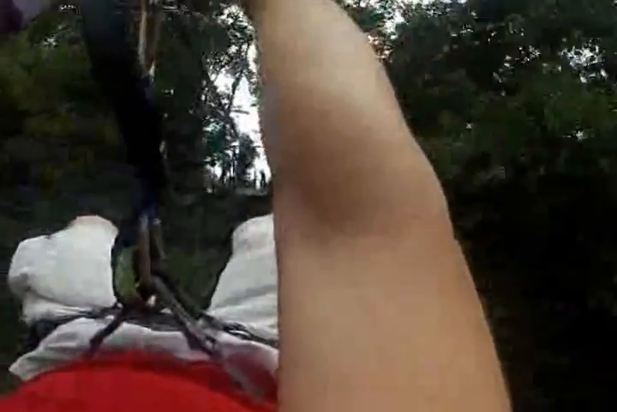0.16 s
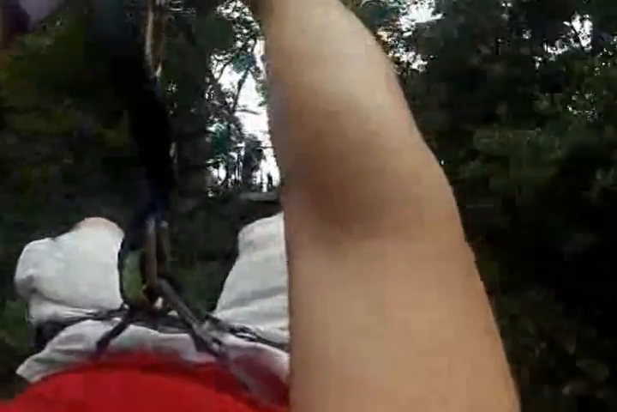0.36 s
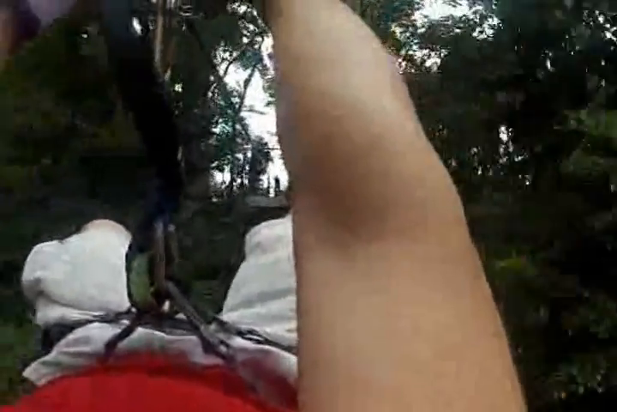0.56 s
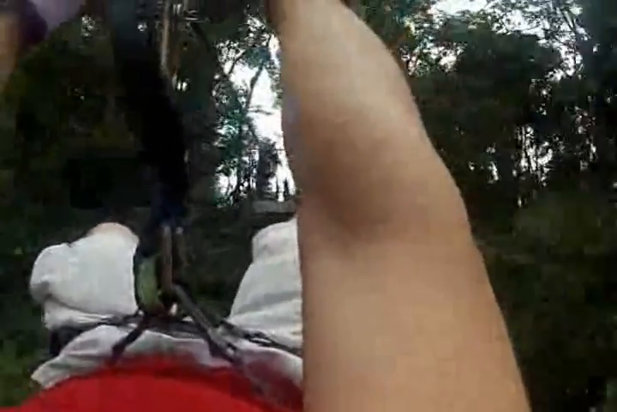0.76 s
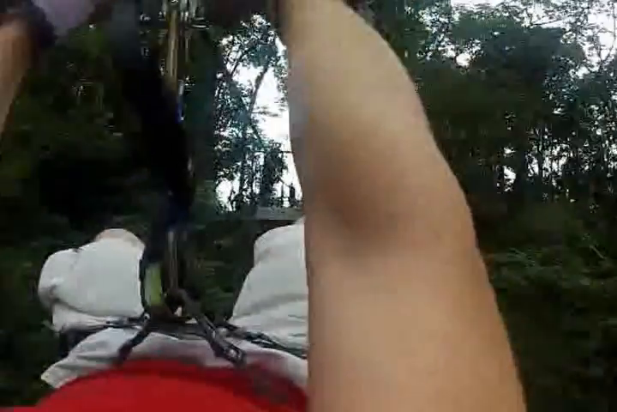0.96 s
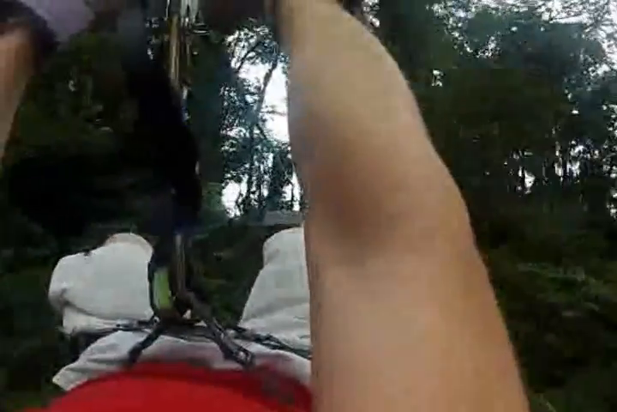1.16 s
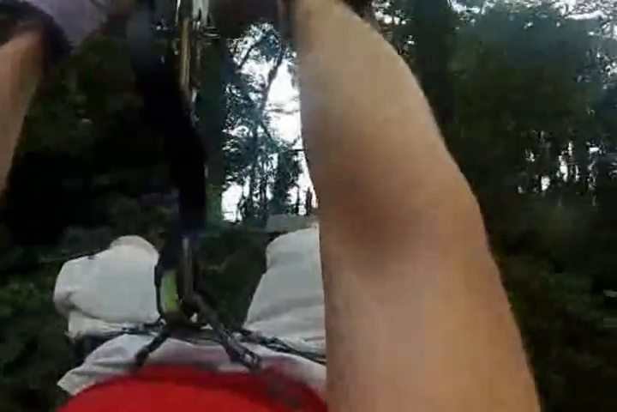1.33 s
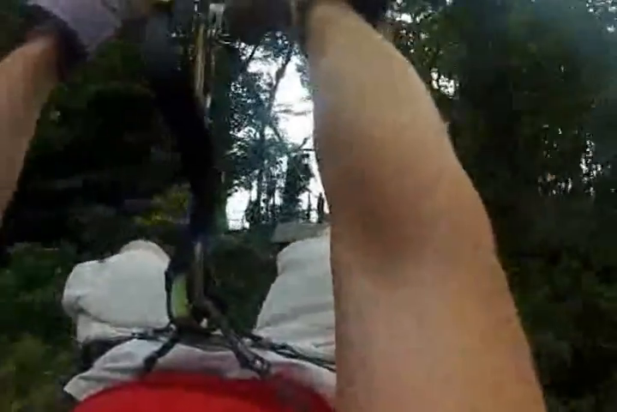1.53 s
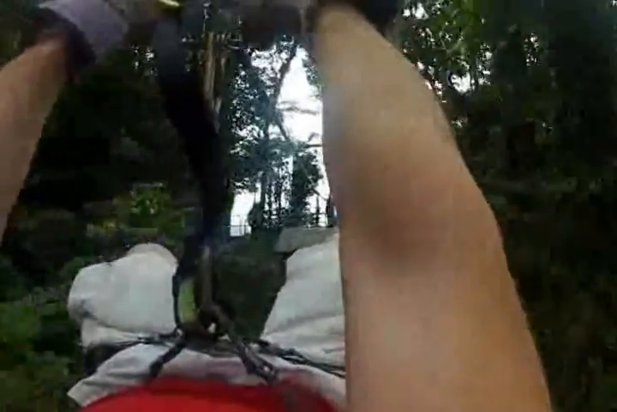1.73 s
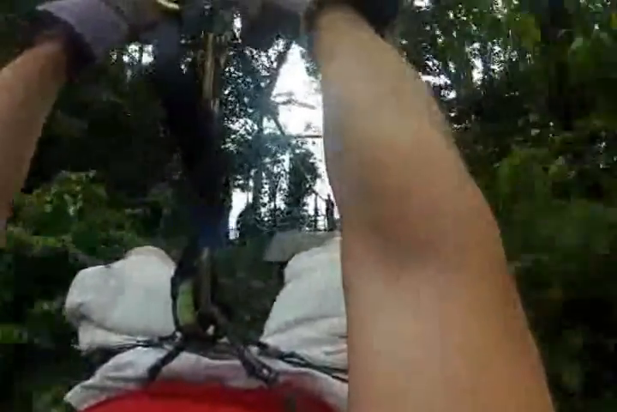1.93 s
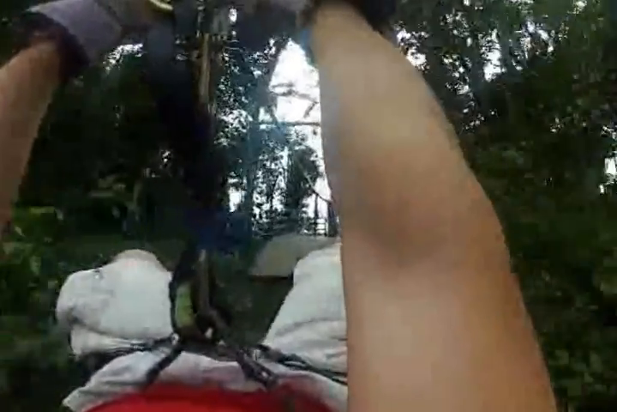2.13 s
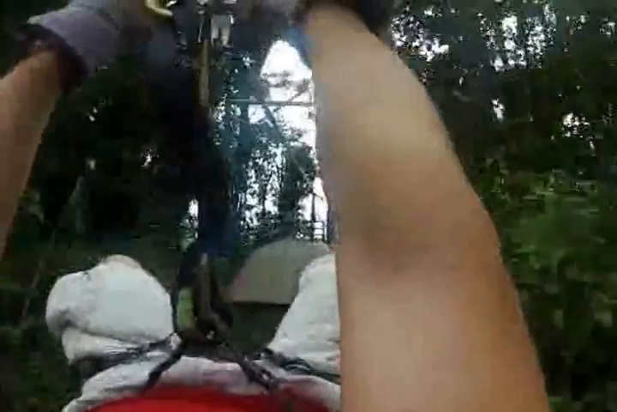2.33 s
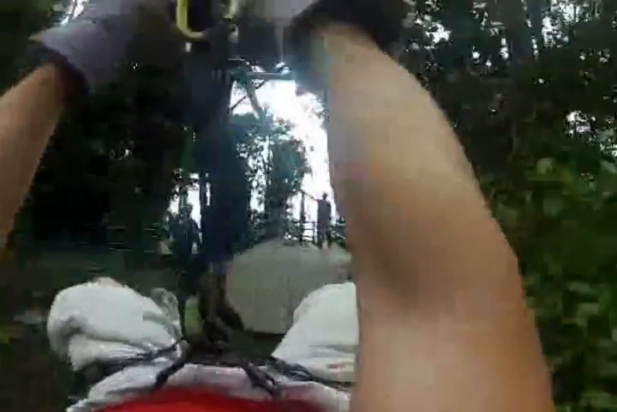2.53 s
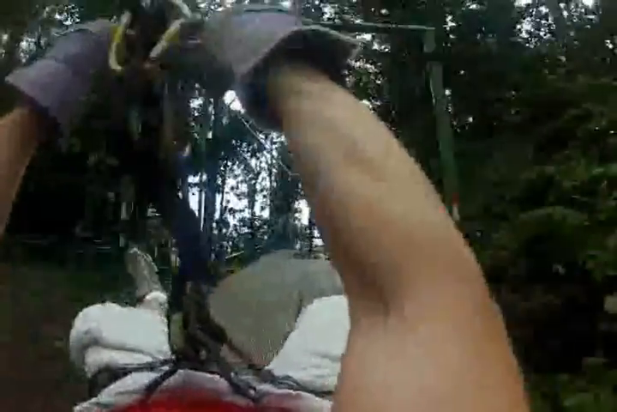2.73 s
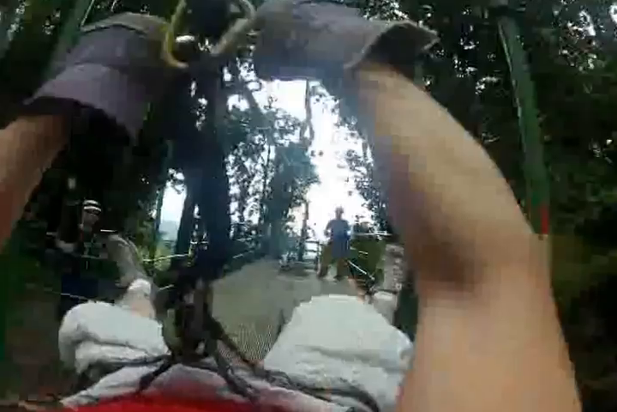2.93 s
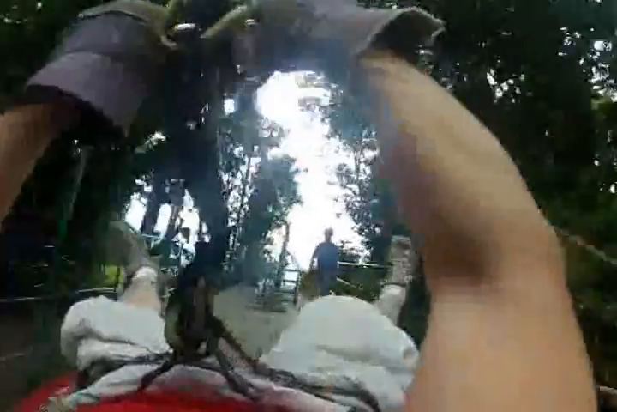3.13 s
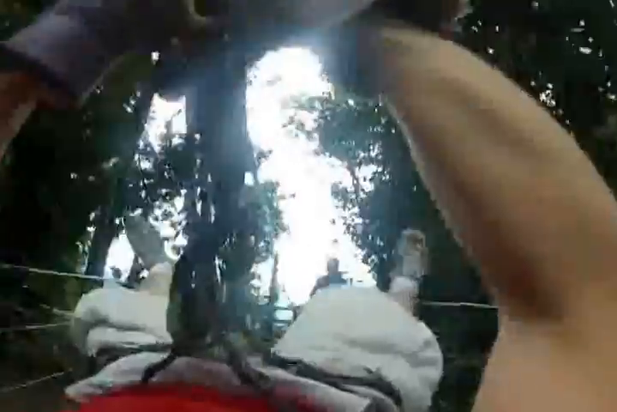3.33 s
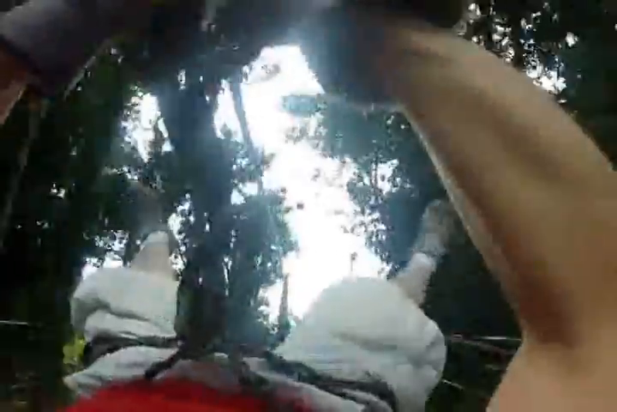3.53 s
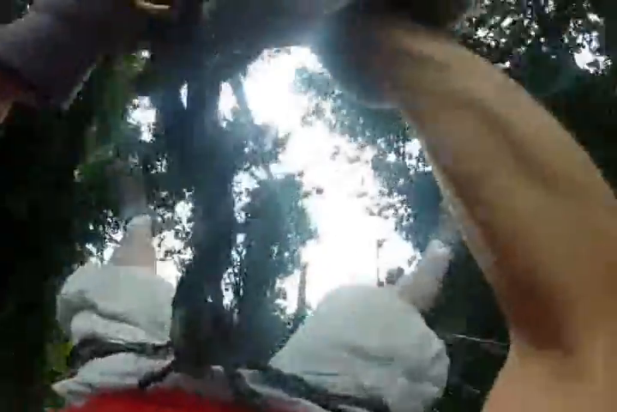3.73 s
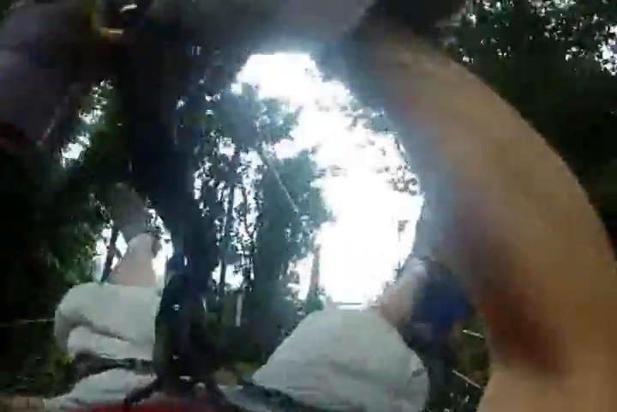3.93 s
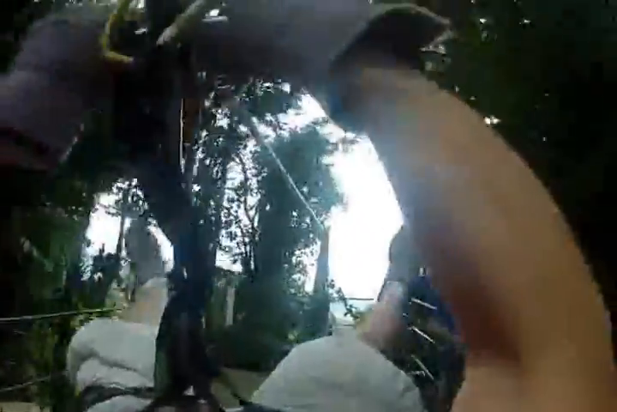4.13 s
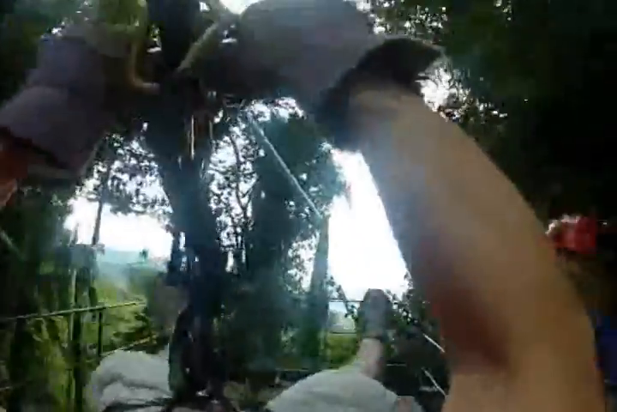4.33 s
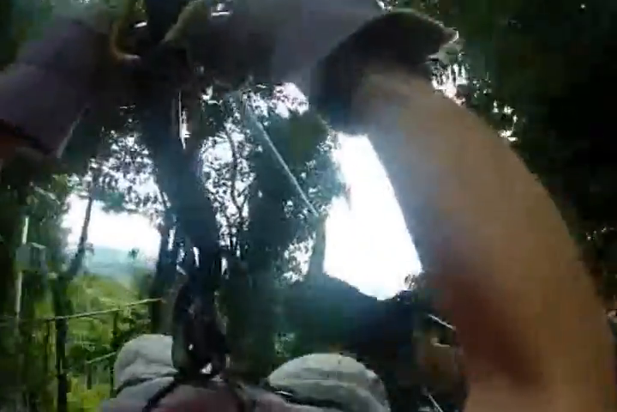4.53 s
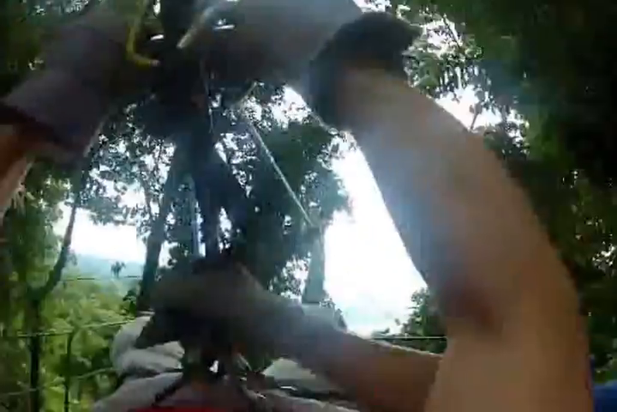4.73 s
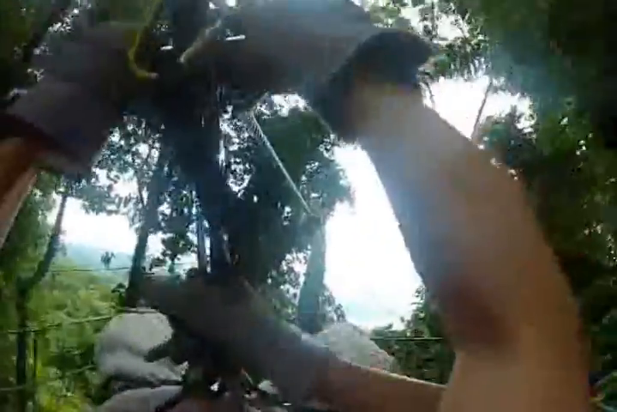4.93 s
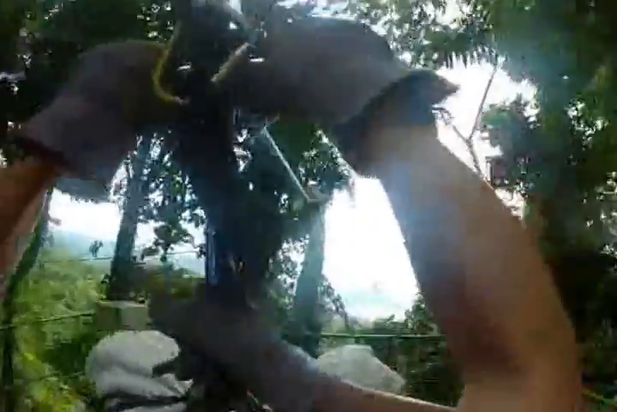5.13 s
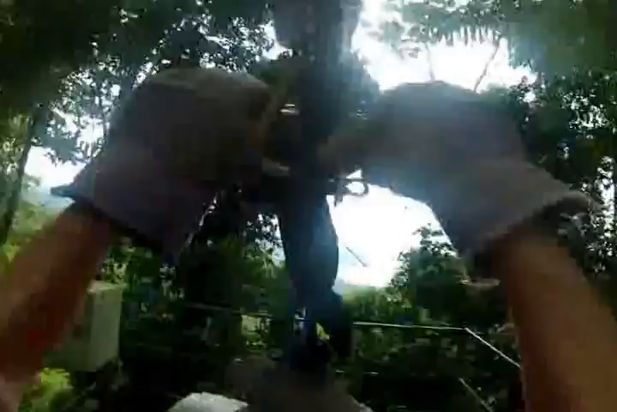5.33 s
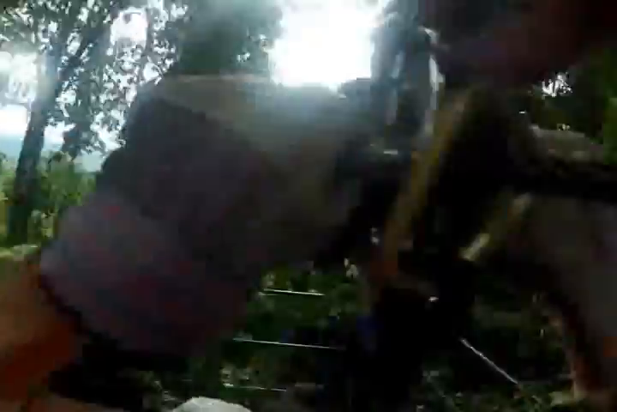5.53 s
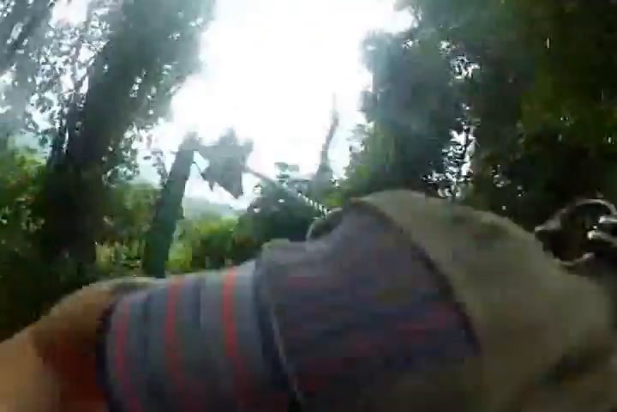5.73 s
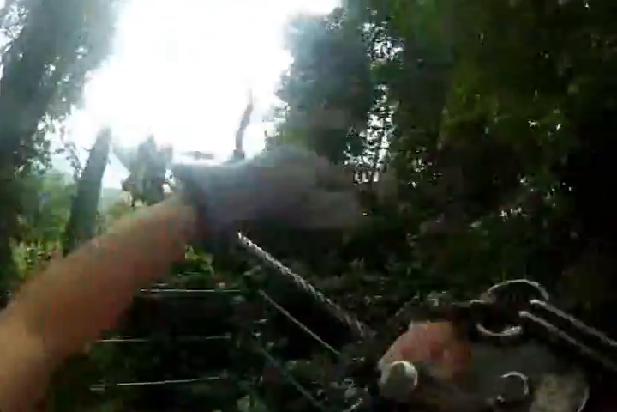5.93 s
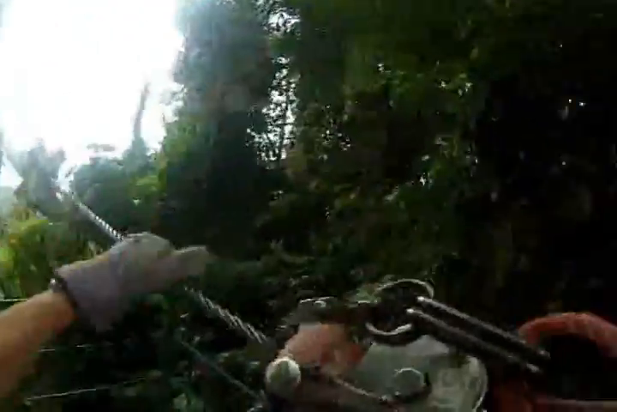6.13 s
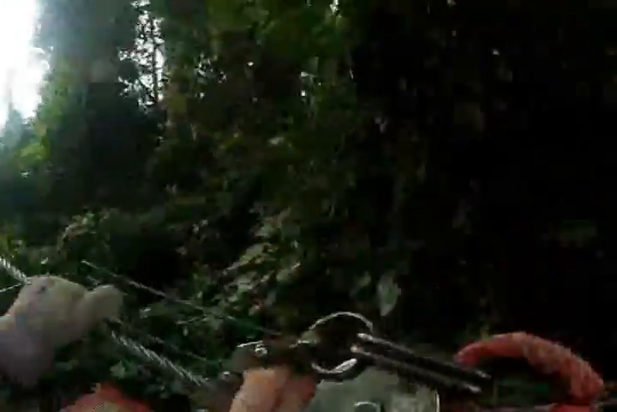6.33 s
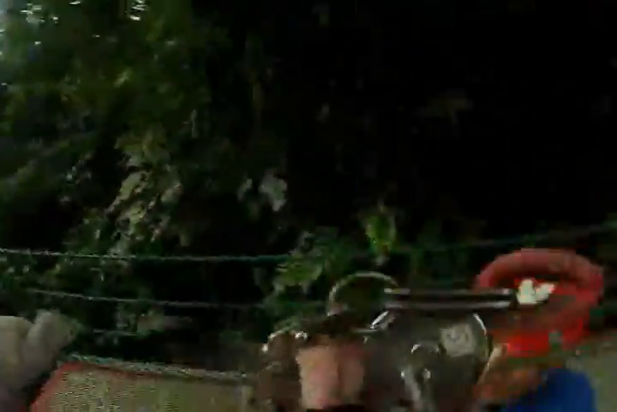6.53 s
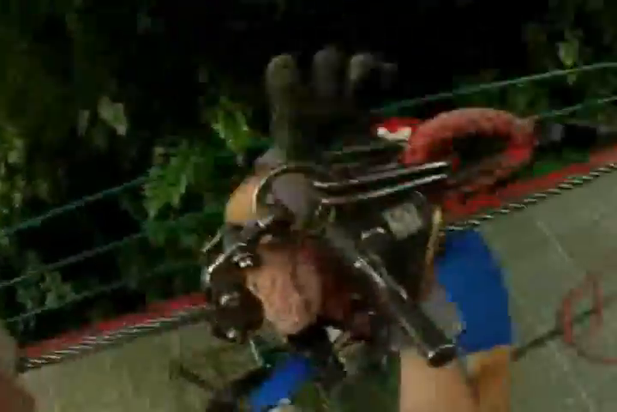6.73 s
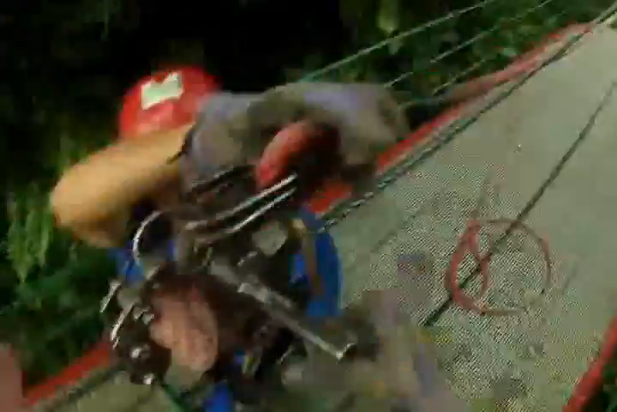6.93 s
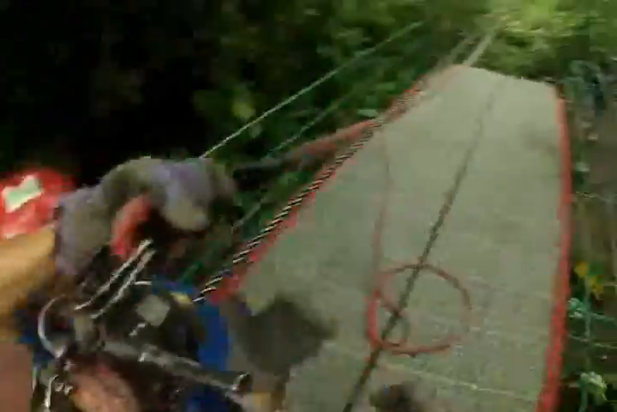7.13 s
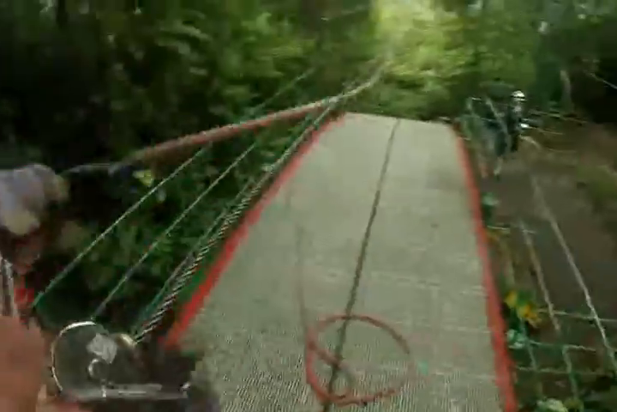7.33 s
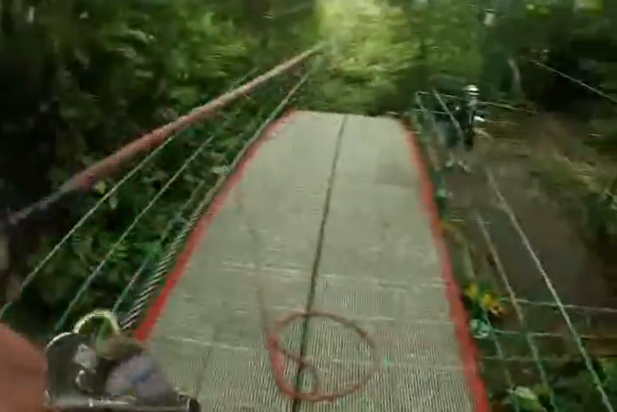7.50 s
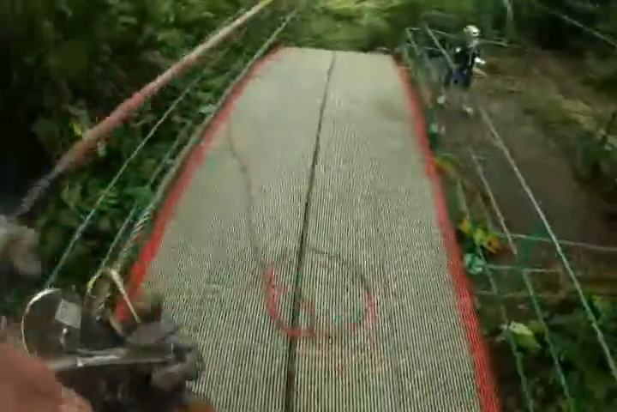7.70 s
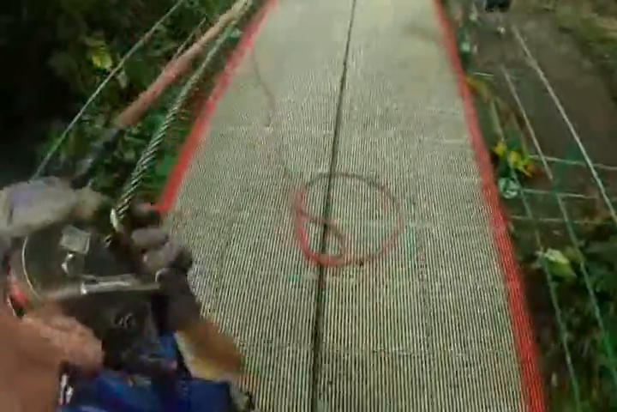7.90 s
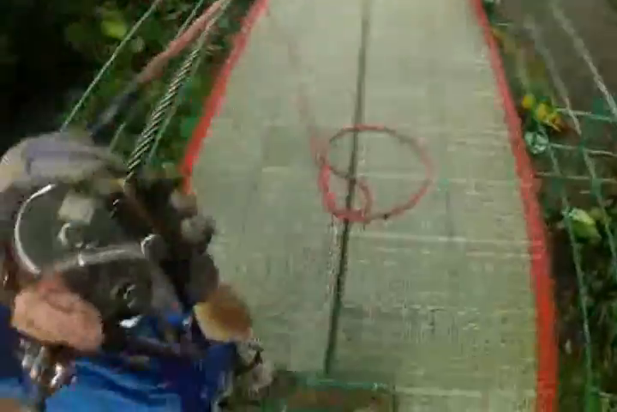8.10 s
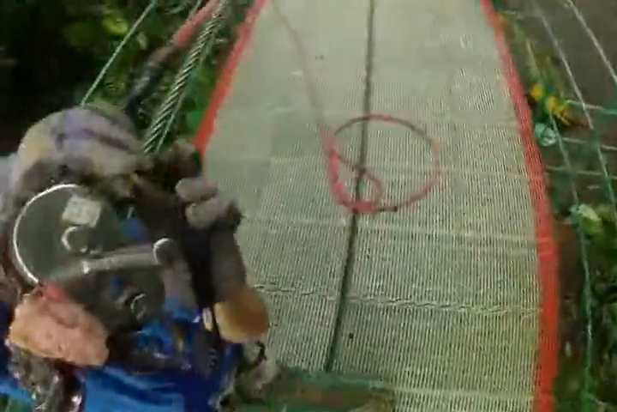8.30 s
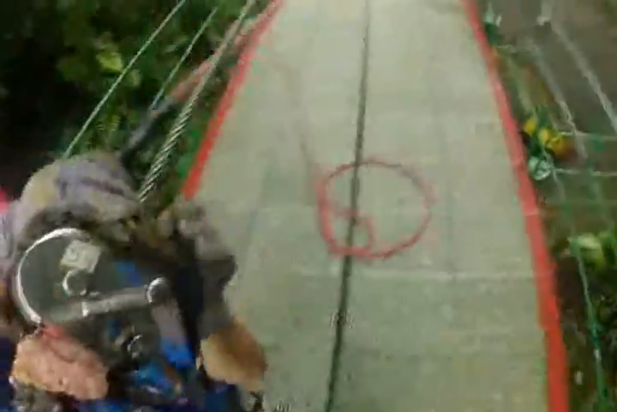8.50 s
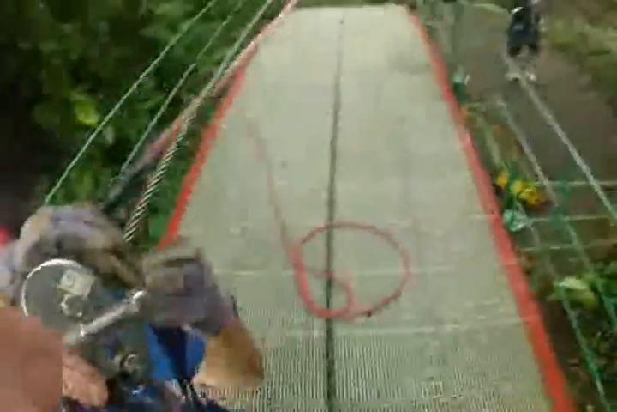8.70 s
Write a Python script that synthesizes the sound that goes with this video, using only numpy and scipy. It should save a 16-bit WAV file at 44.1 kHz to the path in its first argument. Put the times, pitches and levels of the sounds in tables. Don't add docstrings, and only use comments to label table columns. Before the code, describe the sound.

A pulley trolley is already rolling on a steel cable, a loud, gritty metallic rush over low, boxy wind rumble. From about 0.3 s a wavering strand whine slides downward as the ride slows, breaking up and softening toward 2.5 s, then rising slightly. At 3 s the trolley bites the brake: a hard rap, loud scraping, clip clinks, and the heaviest cluster of bangs and booming thuds around 3.5 s. From 3.7 s it drags on with a fading scrape, a clink at 4.1 and a brief sagging squeal near 4.4. Small stuttering jerks at 5.2-5.5 end the motion. Clips clink sharply near 5.9, and a strap creaks upward around 6.15. Until about 9 s, sparse webbing rubs, light taps and dull case bumps sit over faint hiss and distant leaves. The close, sealed-camera sound is narrow, boomy and coarse, with false metallic treble.

```python
import sys
import numpy as np
from scipy import signal
from scipy.fft import rfft, irfft
from scipy.io import wavfile
from scipy.ndimage import uniform_filter1d

SR = 44100
rng = np.random.default_rng(int(sys.argv[2]) if len(sys.argv) > 2 else 0)


def volts(x):
    e = np.asarray(x, float) / 20
    return 10 ** e


def persist_wave(psi):
    counts = np.round(np.clip(psi, -1, 1) * 32767).astype(np.int16)
    wavfile.write(sys.argv[1], SR, np.atleast_2d(counts).T)


N = 390723


def level(x, db=0):
    return x * volts(db) / np.sqrt(np.mean(x ** 2))


def add(out, s, sound):
    i = int(s * SR)
    out[i:i + len(sound)] += sound[:len(out) - i]


def play(table):
    s, *columns = np.transpose(table)
    t = np.arange(N) / SR
    inside = uniform_filter1d(1. * ((t >= s[0]) & (t <= s[-1])), size=600)
    return [inside] + [np.interp(t, s, c) for c in columns]


def walk(rate, size=N):
    k = int(SR / rate)
    held = np.repeat(rng.standard_normal(size // k + 1), k)
    return 1.222 * uniform_filter1d(uniform_filter1d(held, k), k)[:size]


def band(x, hz, width_hz):
    return signal.lfilter(*signal.iirpeak(hz, hz / max(width_hz, 5), fs=SR), x)


def rings(strength, modes, patchy_db=0):
    total = 0
    for hz, width, db in modes:
        noise = strength * rng.standard_normal(len(strength))
        ring = band(band(noise, hz, 1.05 * width), hz, 4.0 * width)
        swell_db = patchy_db * min(120 / width, 1) * walk(25, size=len(strength))
        total = total + volts(db + swell_db) * ring
    return level(total)


def grit(scatter_db, flicker_db, rate, size):
    slip_samples = 24
    slip = np.minimum(rng.exponential(size=size // slip_samples + 1), 3.5)
    slips = np.repeat(volts(scatter_db * slip), slip_samples)[:size]
    return slips * volts(flicker_db * walk(rate, size=size))


def friction(force, modes, balance, scatter_db, flicker_db, rate):
    out = np.zeros(N)
    span = force[0] > 1e-6
    inside, db = force[0][span], force[1][span]
    low_db = balance[0] + balance[1] * (db + 46)
    high_db = balance[2] + balance[3] * (db + 42.5)
    drive = grit(scatter_db, flicker_db, rate, size=len(db))
    middle = rings(drive, [m for m in modes if 1450 <= m[0] < 2600], patchy_db=2.5)
    low = rings(drive, [m for m in modes if m[0] < 1450], patchy_db=4.5)
    high = rings(drive, [m for m in modes if m[0] >= 2600], patchy_db=2.7)
    out[span] = inside * volts(db) * (middle + volts(low_db) * low + volts(high_db) * high)
    return out


# t/s, friction level/dB
ROLLING_FORCE = [(0.0, -36), (.3, -41), (.4, -37.5), (1.36, -40), (1.46, -45), (2.42, -49), (2.5, -44.5),
                 (2.95, -46), (3.04, -39)]
# f/Hz, width/Hz, level/dB
TROLLEY_MODES = [(1067, 530, 17), (1190, 600, -22), (1800, 226, 1), (2129, 53, 9), (2380, 570, 3.5),
                 (2945, 64, 4.5), (3260, 920, -7.5), (3470, 850, -7.5)]
# low ring level/dB, slope/(dB per dB), high ring level/dB, slope/(dB per dB)
TROLLEY_TILT = (-3, -.5, -2.5, -0.15)


def rolling():
    return friction(play(ROLLING_FORCE), TROLLEY_MODES, TROLLEY_TILT, 2.43, 0.38, 39.1)


# multiple of the strand rate, level/dB
WHINE_PARTIALS = [(3, -2), (4, 4), (5, 1.5)]


def whine(table):
    inside, hz, db = play(table)
    overtone_db = -11 + 0.2789 * (np.clip(hz, 535, 595) - 550)
    phase = 2 * np.pi * np.cumsum(hz * (1 + 0.01195 * walk(140))) / SR
    overtones = sum(volts(d + 3.15 * walk(120)) * np.sin(k * phase) for k, d in WHINE_PARTIALS)
    stutter_db = np.maximum(.075 * (570 - hz), 1) * walk(22.04)
    leading = volts(3.8 * walk(90) + stutter_db) * np.sin(2 * phase)
    return inside * volts(db + 6.5) * (leading + volts(overtone_db) * overtones)


# t/s, strand rate f/Hz, level/dB
STRAND_WHINE = [(.25, 617, -60.5), (.5, 605.4, -50.5), (1.4, 554.3, -49), (1.5, 549, -60),
                (1.86, 529, -49.5), (2.44, 504, -49.5), (2.5, 498, -61), (2.78, 514, -49),
                (2.92, 531, -58.5)]


def strand_whine():
    return whine(STRAND_WHINE)


# t/s, friction level/dB
BITING_FORCE = [(3.04, -39.5), (3.12, -43.5), (3.25, -38.5), (3.46, -40), (3.68, -34.5)]
# f/Hz, width/Hz, level/dB
BLOCK_MODES = [(900, 1270, -11), (1372, 130, -1), (1747, 210, -5.5), (2030, 144, 5), (2250, 281, -0.5),
               (2980, 250, -4.5), (3240, 73, -5.5), (3430, 330, -14)]
# low ring level/dB, slope/(dB per dB), high ring level/dB, slope/(dB per dB)
BLOCK_TILT = (-0.79, -0.66, -0.54, -0.63)


def biting():
    return friction(play(BITING_FORCE), BLOCK_MODES, BLOCK_TILT, 1.7, 0.9, 40)


# t/s, friction level/dB
DRAGGING_FORCE = [(3.68, -36), (4.276, -38.5), (4.636, -42.5), (4.69, -47), (4.886, -45.5), (5.3, -48),
                  (5.58, -55.5), (5.66, -65), (5.88, -74.5)]
# f/Hz, width/Hz, level/dB
BRAKE_MODES = [(920, 920, -5), (1130, 430, 0), (1598, 96, -2.5), (1830, 160, -2), (2050, 49, 1),
               (2195, 130, -2), (2380, 280, -6), (2970, 170, 3), (3550, 570, -8), (3680, 1000, -4)]
# low ring level/dB, slope/(dB per dB), high ring level/dB, slope/(dB per dB)
BRAKE_TILT = (-11, 0.23, -6.5, 0.14)


def dragging():
    return friction(play(DRAGGING_FORCE), BRAKE_MODES, BRAKE_TILT, 3.1, 0.75, 40)


# t/s, strand rate f/Hz, level/dB
BRAKE_SQUEAL = [
    (4.3, 520, -58),
    (4.35, 512, -53),
    (4.43, 485, -56.5),
    (4.47, 475, -68.5),
]


def brake_squeal():
    return whine(BRAKE_SQUEAL)


def clicks(table, high_hz, scrape, crack, knock, tail):
    out, t = np.zeros(N), np.arange(SR // 8) / SR
    attack = 1 - np.exp(-t / 0.00025)
    decay = np.exp(-(t / max(2 * scrape, .001)) ** 2) + tail * np.exp(-t / 0.024)
    for (s, db, low_hz, high_db), noise in zip(table, rng.standard_normal((len(table), len(t)))):
        burst = noise * attack * decay
        dull = band(band(burst, low_hz, 400), low_hz, 700)
        bright = band(band(burst, high_hz, 470), high_hz, 870)
        ring = level(dull, -5.5) + level(bright, high_db)
        ring = ring + crack * level(band(burst, 2300, 3600)) + knock * level(band(burst, 590, 710))
        add(out, s - .0005, volts(db) * ring / np.abs(ring).max())
    return out


# t/s, peak level/dB, f/Hz, second ring level/dB
SHELL_RAPS = [(3.051, -15, 853, -12), (3.074, -26, 930, -1), (3.484, -10, 890, -8.5),
              (3.502, -15.5, 870, -2), (3.5505, -9, 900, 2.5), (3.6265, -11.5, 835, -5),
              (6.211, -54, 1150, -8), (6.643, -47, 1090, -8), (6.878, -49, 738, -10), (7.199, -53, 899, -9),
              (7.259, -47.5, 1030, -15), (7.558, -51, 713, -4), (7.715, -51, 883, -25),
              (7.852, -53, 1130, -9), (8.203, -55, 912, -20), (8.439, -63, 856, -10),
              (8.699, -59, 764, -17), (8.722, -50.5, 900, -17), (8.742, -50, 737, -26)]


def shell_raps():
    return clicks(SHELL_RAPS, 1850, scrape=0.0026, crack=0.13, knock=.42, tail=0.182)


# t/s, peak level/dB, f/Hz, second ring level/dB
CLIP_CLINKS = [(3.314, -22.5, 2330, -13), (3.359, -20.5, 2380, -29), (4.114, -22, 2070, 2),
               (5.529, -39, 2030, -7), (5.895, -35, 2260, -20), (5.91, -24.5, 1880, 0),
               (5.917, -30.5, 2390, -6.5), (6.499, -42.5, 3400, -13), (6.928, -54, 2620, -25),
               (7.629, -38.5, 2200, -17), (7.789, -57, 2340, -9), (7.891, -55, 1700, -6),
               (7.966, -43, 3660, -12), (8.229, -61, 2500, -8), (8.441, -60, 2930, -20)]


def clip_clinks():
    return clicks(CLIP_CLINKS, 2890, scrape=.0042, crack=0.69, knock=0.11, tail=0.174)


# t/s, peak level/dB, f/Hz, second ring level/dB
STALL_JUDDER = [(5.236, -39, 2100, -3), (5.383, -42, 2100, 0), (5.396, -37.5, 2100, 0),
                (5.408, -39, 2100, 0), (5.424, -42, 2100, 0), (5.446, -38, 2120, -6),
                (5.462, -42, 2100, -3), (5.492, -36.5, 2100, -13), (5.548, -57, 2100, -2)]


def stall_judder():
    return clicks(STALL_JUDDER, 2900, scrape=0.0026, crack=0.79, knock=.03, tail=0.05)


def knocks(table, t60_s):
    out, t = np.zeros(N), np.arange(SR // 4) / SR
    upper = (np.sin(2 * np.pi * 250 * t) + 0.62 * np.sin(2 * np.pi * 390 * t)) * np.exp(-t / 0.015)
    for s, db, hz, upper_db in table:
        t60 = t60_s * volts(-0.06 * (db + 42.5))
        fall = np.exp(-np.log(1000) * (t / max(t60, .06)) ** 0.92) * (1 - np.exp(-t / 0.004)) ** 2.0
        ring = -np.sin(2 * np.pi * hz * t + 0.7 * (1 - np.exp(-t / 0.0061)))
        ring = ring + volts(upper_db) * upper + 0.28 * np.sin(2 * np.pi * 70 * t)
        add(out, s + 0.00066, volts(db + 3.5) * fall / fall.max() * ring)
    return out


# t/s, peak level/dB, f/Hz, upper wall level/dB
BRAKE_JOLTS = [(2.701, -28.5, 133, -15), (3.047, -19.5, 132, -10), (3.11, -29.5, 104, -6),
               (3.38, -28.5, 93, -24), (3.416, -22.5, 120, -14), (3.437, -22.5, 198, -32),
               (3.48, -12.5, 160, -9), (3.491, -19, 182.6, -10), (3.512, -25, 171, -7),
               (3.547, -27.5, 140, -3), (3.572, -27, 161, -23), (3.626, -21.5, 85, -5.5),
               (3.658, -26.5, 120, -20), (3.793, -39, 92, -8), (3.848, -43.5, 127, -5),
               (3.897, -35, 122, -10), (3.949, -46, 109, -0.5), (4.061, -41, 90.5, -20),
               (4.131, -43, 124, -3), (4.187, -35, 155, -17), (4.262, -33.5, 131, -8),
               (4.766, -42.5, 135, -6), (4.801, -45, 145, -16), (4.91, -48.5, 110, 1.5),
               (4.952, -45, 99, -12), (5.064, -44.5, 124, -26), (5.411, -48, 136, -2),
               (5.497, -47.5, 127, -12)]


def brake_jolts():
    return knocks(BRAKE_JOLTS, t60_s=0.073)


# t/s, peak level/dB, f/Hz, upper wall level/dB
PLATFORM_BUMPS = [(5.724, -44, 155, -34), (5.802, -49.5, 112, -11), (5.943, -43, 99.6, -9),
                  (5.988, -35, 127, -21), (6.205, -37.5, 105, -16), (6.248, -48, 109, -24),
                  (6.353, -36.5, 89, -13), (6.385, -33.5, 130, -22), (6.693, -41, 120.6, -23),
                  (6.773, -40, 117, -7), (6.863, -37, 106, -22), (6.884, -31.5, 147, -10.5),
                  (6.944, -40.5, 100, -4), (7.207, -45.5, 146, -17), (7.246, -35, 105, -10.5),
                  (7.341, -47.5, 121, -15), (7.554, -32, 119, -14), (7.661, -52, 117, -18),
                  (8.198, -36.5, 134, -10), (8.321, -52, 135, -5.5), (8.63, -49, 91.5, -8),
                  (8.723, -51, 149, -20), (8.739, -35, 136, -4.5), (8.808, -47, 154, -21)]


def platform_bumps():
    return knocks(PLATFORM_BUMPS, t60_s=0.067)


# t/s, hold/s, level/dB
RUB_EVENTS = [(5.93, 0.009, -67), (6.206, 0.016, -67.5), (6.317, 0.027, -57), (6.39, 0.037, -68.5),
              (6.547, 0.076, -66.5), (6.63, 0.11, -59), (6.761, 0.095, -59.5), (6.876, .015, -58),
              (6.961, 0.021, -57.5), (7.068, 0.057, -66), (7.16, 0.066, -69.5), (7.255, .03, -66.5),
              (7.338, .005, -66.5), (7.46, .03, -71), (7.65, 0.047, -67), (7.727, 0.047, -76),
              (7.978, 0.054, -70), (8.362, 0.022, -62.5), (8.47, 0.018, -77)]
# f/Hz, width/Hz, level/dB
WEBBING_MODES = [(887, 350, -3), (1016, 150, 4), (1950, 410, 0), (2140, 114, -2.5), (2710, 1100, -6.5),
                 (3280, 1100, -10.5)]
# low ring level/dB, slope/(dB per dB), high ring level/dB, slope/(dB per dB)
WEBBING_TILT = (1.5, 0.17, -19, -0.45)


def webbing_rubs():
    t = np.arange(N) / SR
    attack_db_s, release_db_s, brushing_db = 600, 650, -77.5
    each = []
    for s, hold, db in RUB_EVENTS:
        rise = attack_db_s * np.maximum(s - t, 0)
        each.append(db - np.maximum(rise, release_db_s * (t - s - hold)))
    force = t > RUB_EVENTS[0][0], np.maximum(np.max(each, axis=0), brushing_db)
    return friction(force, WEBBING_MODES, WEBBING_TILT, 2.9, 1.8, 50)


# t/s, slip rate f/Hz, level/dB
STRAP_CREAK = [
    (6.1, 197, -55),
    (6.13, 257, -48),
    (6.155, 382, -50),
    (6.17, 415, -43),
    (6.205, 435, -66),
]


def strap_creak():
    inside, hz, db = play(STRAP_CREAK)
    phase = 2 * np.pi * np.cumsum(hz * (1 + .14 * walk(200))) / SR
    return inside * volts(db + 2.8 * walk(90)) * np.sin(phase)


# t/s, boom level/dB
RIDE_BOOM = [(0.0, -34), (0.09, -33.5), (0.29, -34), (1.01, -38), (1.6, -38.5), (2.1, -40), (2.55, -39.5),
             (2.84, -43.5), (3.0, -41.5)]
STOP_BOOM = [(3.2, -41), (3.37, -39), (3.5, -29.5), (3.67, -36.5), (3.9, -62), (4.11, -41.5), (4.53, -66),
             (4.93, -51.5), (5.11, -62.5)]
HAND_BOOM = [(5.72, -63), (6.2, -49.5), (6.46, -60), (6.72, -46.5), (6.97, -58), (7.74, -60.5), (8.05, -64),
             (8.2, -58.5), (8.65, -60.5)]
# f/Hz, width/Hz, level/dB
WALL_MODES = [(121, 68, -4.5), (153.3, 18.7, 0.5)]
UPPER_WALL_MODES = [(248.6, 88, 1), (380.4, 82, -2), (520, 66.3, -11.5)]
SWAY_MODES = [(29.9, 15, -7), (85, 28, -3.5)]


def case_boom():
    _, db = play(RIDE_BOOM + STOP_BOOM + HAND_BOOM)
    upper_db = -10.5 - 0.1728 * (db + 48) + 2 * play(RIDE_BOOM)[0]
    sway_db = -5.5 + 0.0129 * (db + 52)
    gusts = volts(3.15 * walk(35))
    boom = level(band(rings(gusts, WALL_MODES), 145, 300))
    sway = level(band(rings(gusts, SWAY_MODES), 75, 150))
    upper = level(band(rings(volts(1.54 * walk(45)), UPPER_WALL_MODES), 330, 450))
    return volts(db) * (boom + volts(sway_db) * sway + volts(upper_db) * upper)


# f/Hz, density level/(dB per Hz)
HISS_SPECTRUM = [(500, 7.5), (900, 2), (1500, -6.5), (2300, -17.5), (3200, -7.5), (4200, -13)]


def hiss():
    hz, db = np.transpose(HISS_SPECTRUM)
    bins = np.fft.rfftfreq(N, 1 / SR) + 1
    shape = volts(np.interp(np.log(bins), np.log(hz), db))
    shaped = irfft(rfft(rng.standard_normal(N)) * shape, N)
    return level(shaped, -68.5) * volts(3.3 * walk(30))


def scene():
    ride = rolling() + strand_whine()
    braking = biting() + dragging() + brake_squeal()
    hits = shell_raps() + clip_clinks() + stall_judder() + brake_jolts() + platform_bumps()
    platform = webbing_rubs() + strap_creak()
    return (ride + braking + hits + platform + case_boom() + hiss())[None]


def low_pass(x):
    return signal.sosfilt(signal.butter(12, 15960, fs=SR, output="sos"), x)


def record(dry):
    overload, hold_samples = .55, 11 / 2
    soft = overload * np.tanh(dry[0] / overload)
    narrow = signal.sosfilt(signal.butter(8, 4000, fs=SR, output="sos"), soft)
    taken_at = np.floor(np.arange(N) / hold_samples) * hold_samples
    held = np.interp(taken_at, np.arange(N), narrow)[None]
    held = signal.sosfilt(signal.butter(3, 55, "high", fs=SR, output="sos"), held)
    mix = signal.sosfilt(signal.ellip(10, .2, 60, 15900, fs=SR, output="sos"), held)
    return low_pass(mix)


dry = scene()
out = record(dry)
persist_wave(out)
```